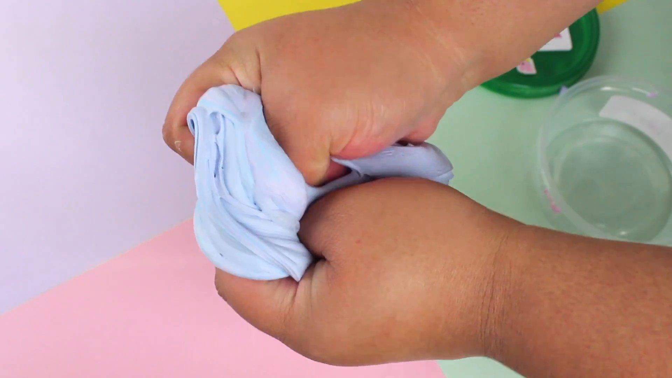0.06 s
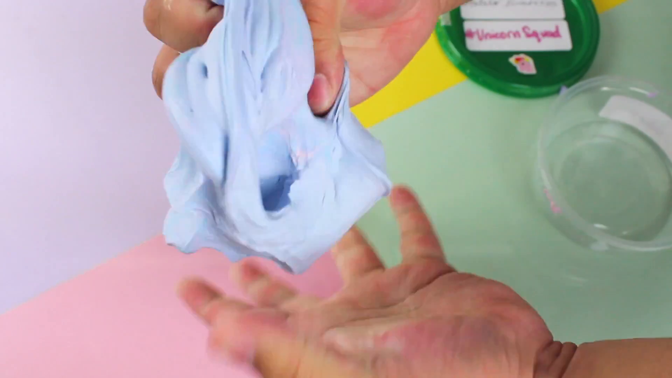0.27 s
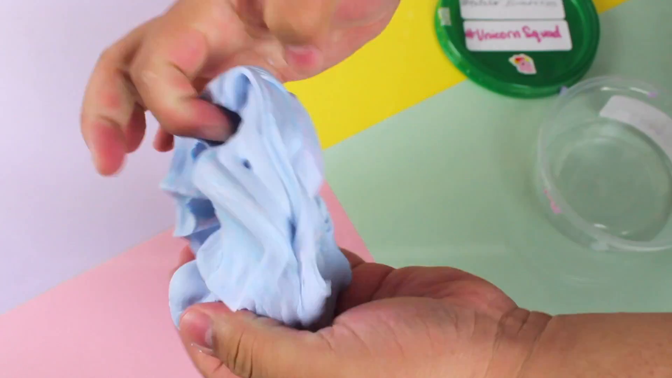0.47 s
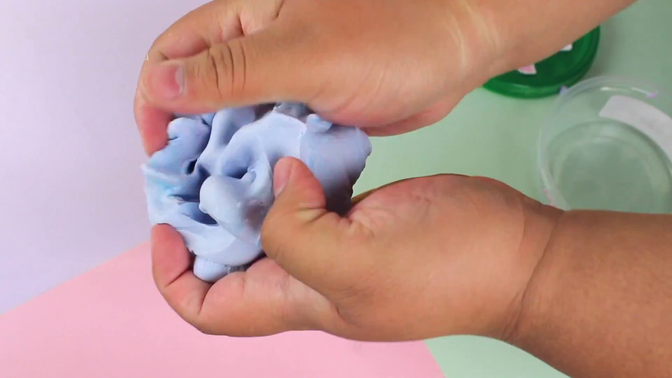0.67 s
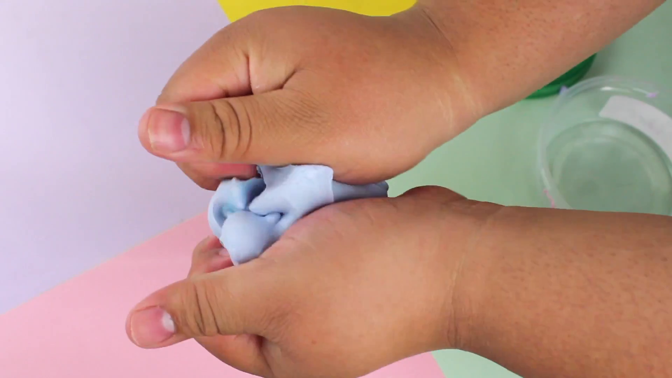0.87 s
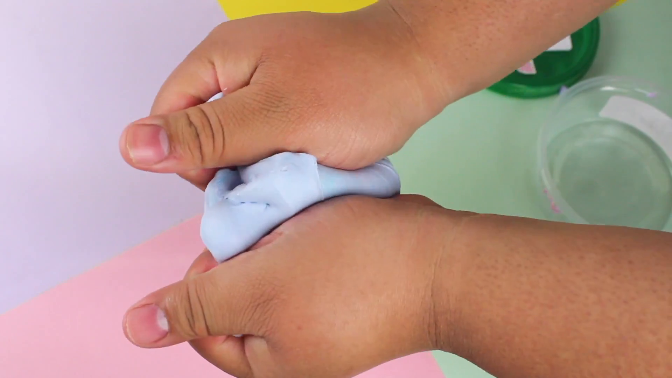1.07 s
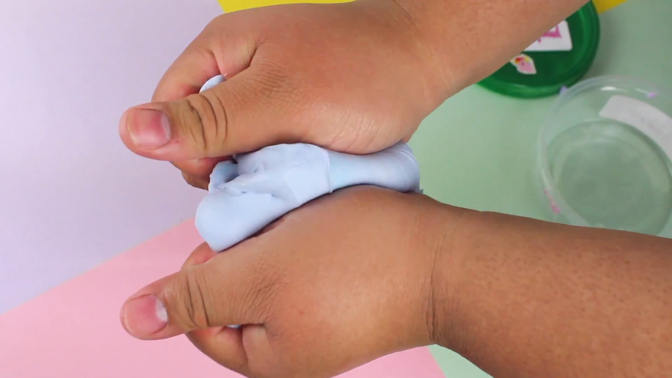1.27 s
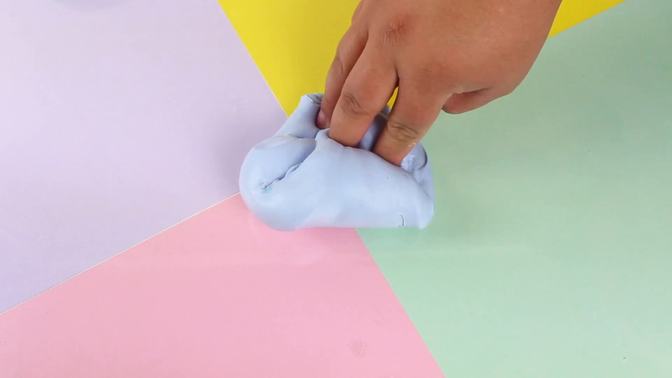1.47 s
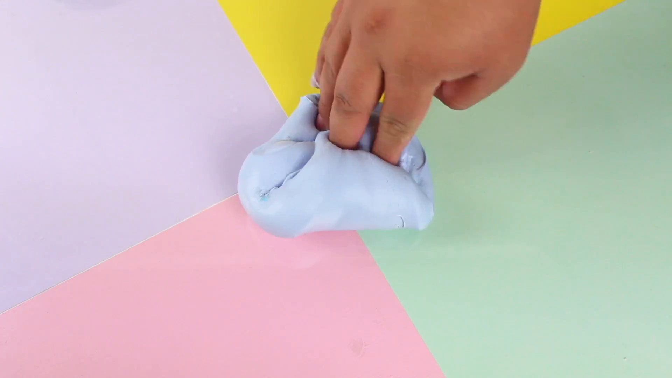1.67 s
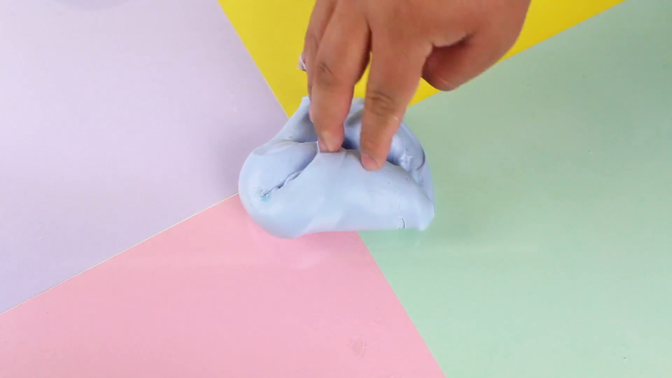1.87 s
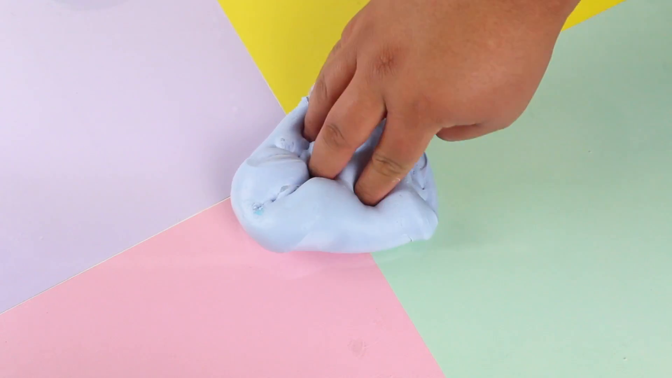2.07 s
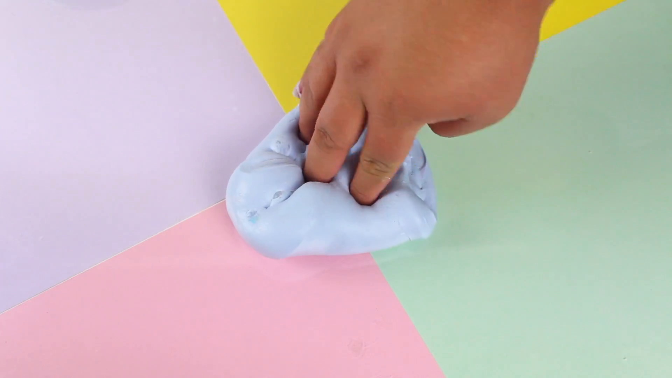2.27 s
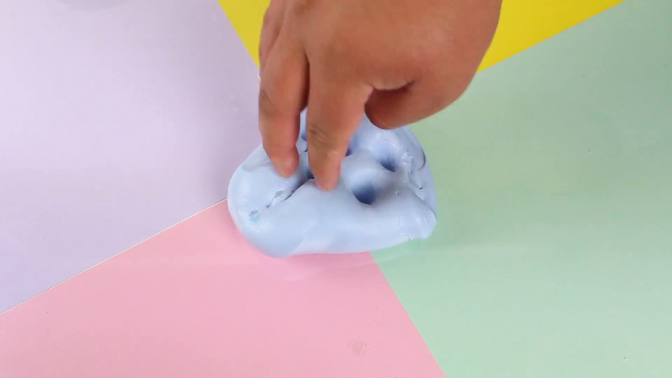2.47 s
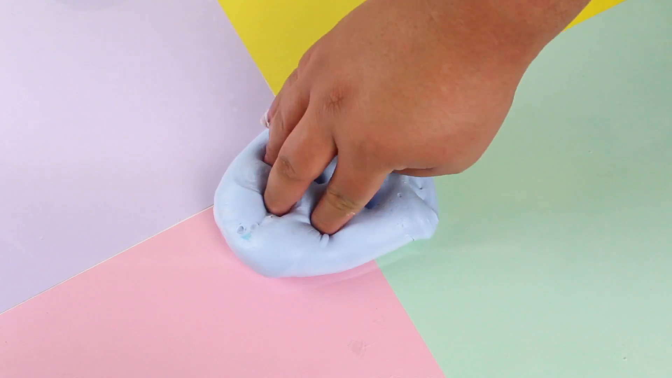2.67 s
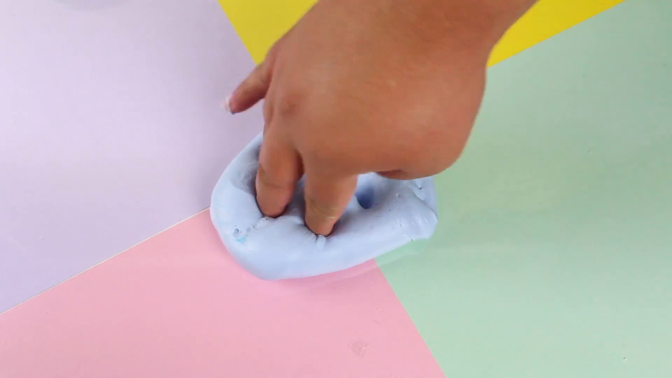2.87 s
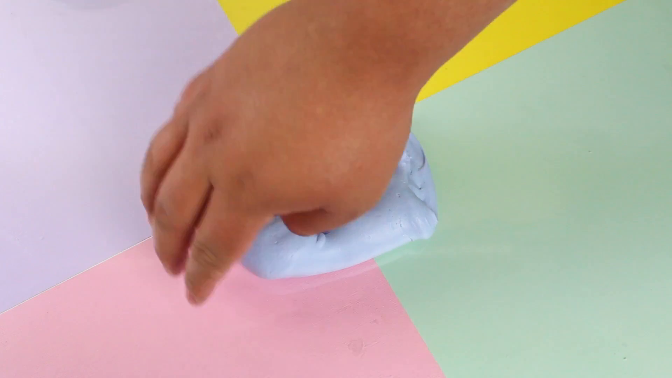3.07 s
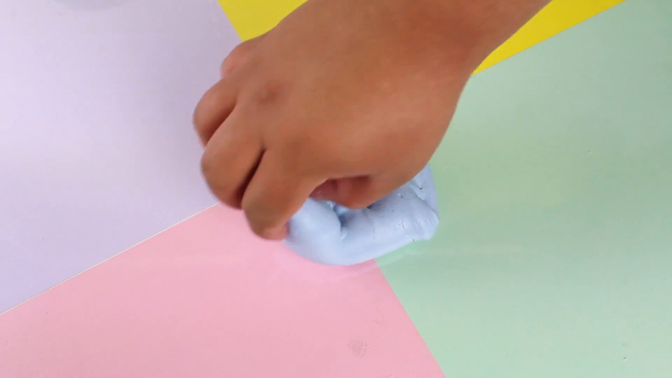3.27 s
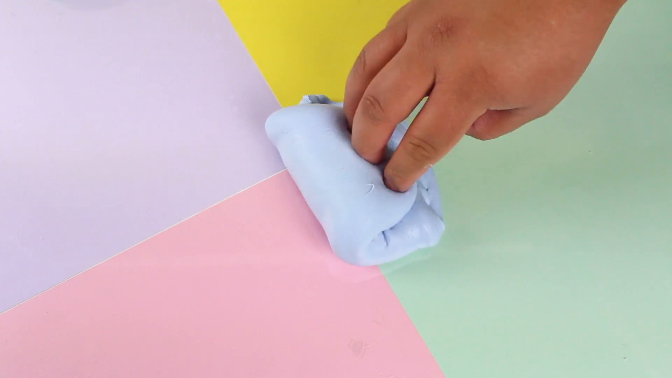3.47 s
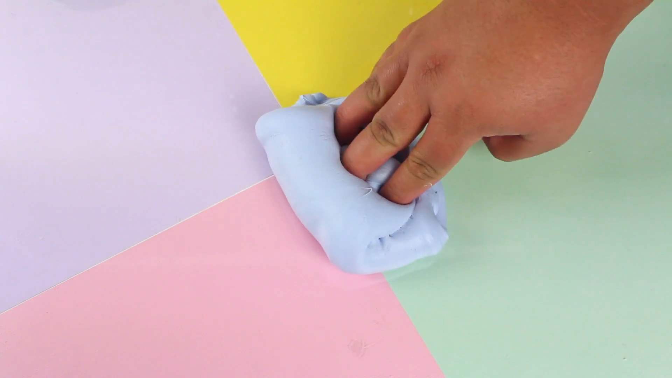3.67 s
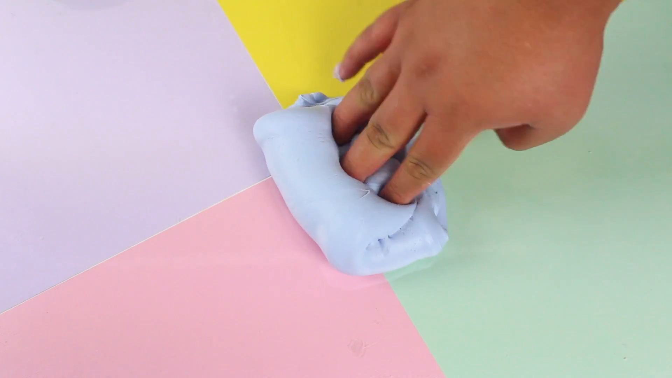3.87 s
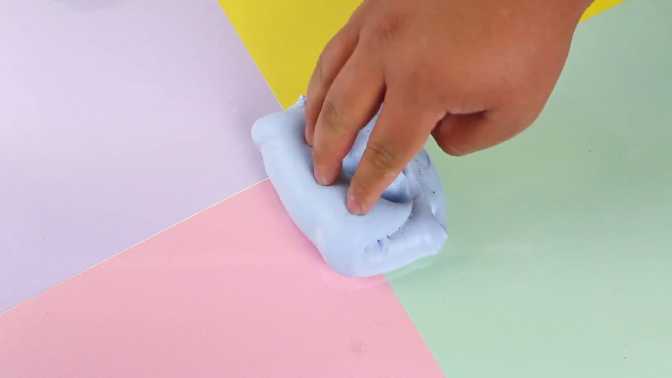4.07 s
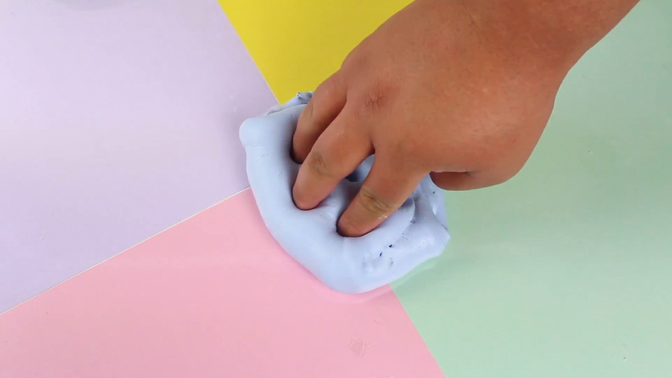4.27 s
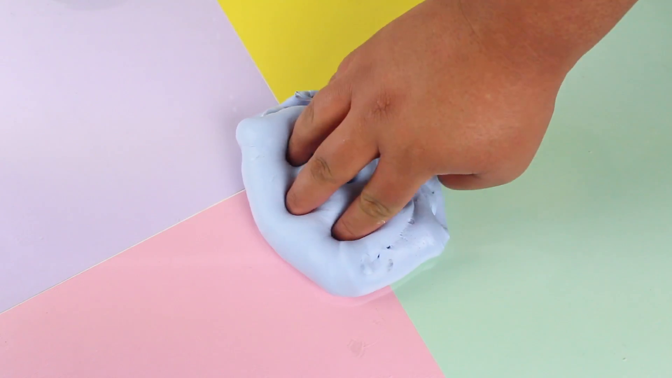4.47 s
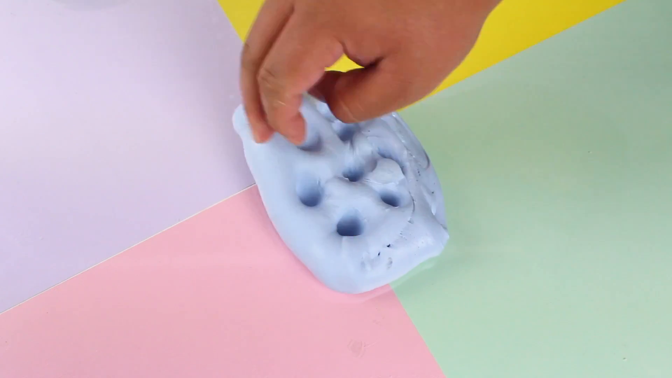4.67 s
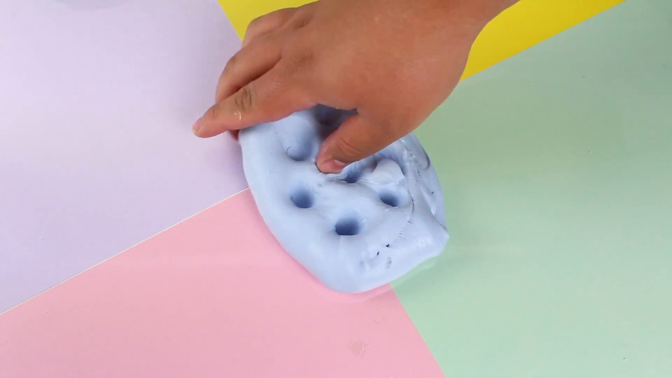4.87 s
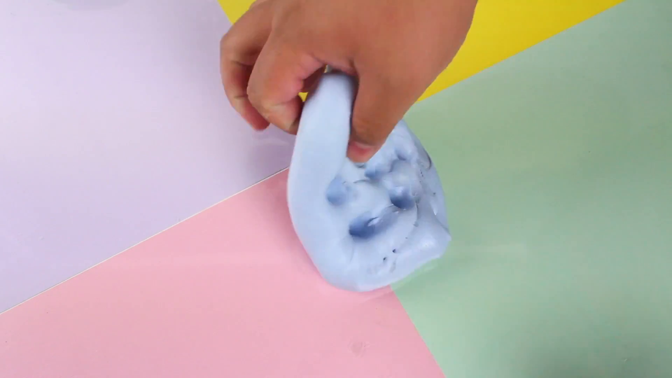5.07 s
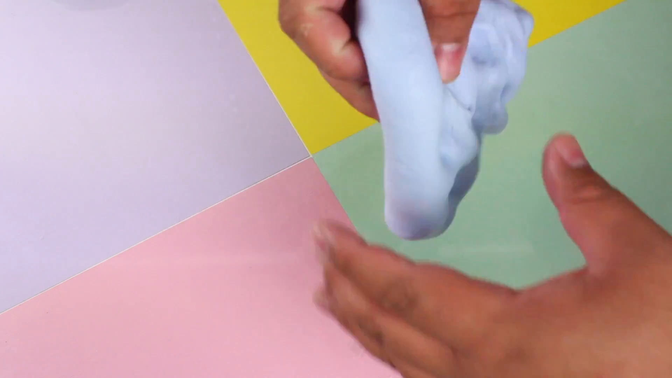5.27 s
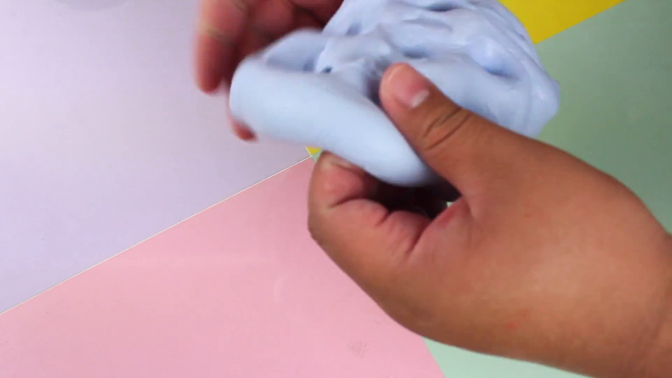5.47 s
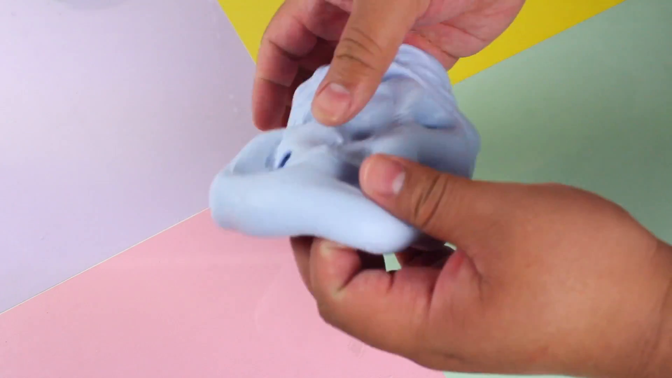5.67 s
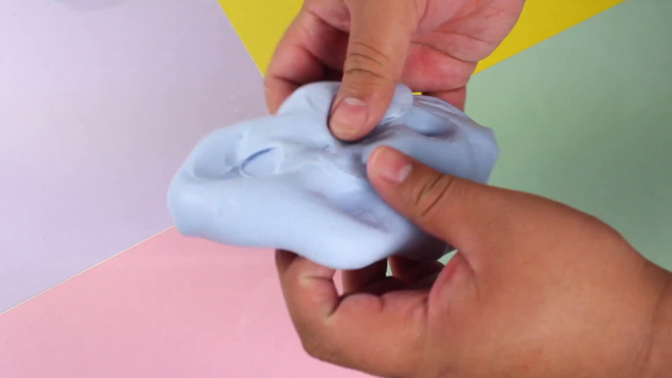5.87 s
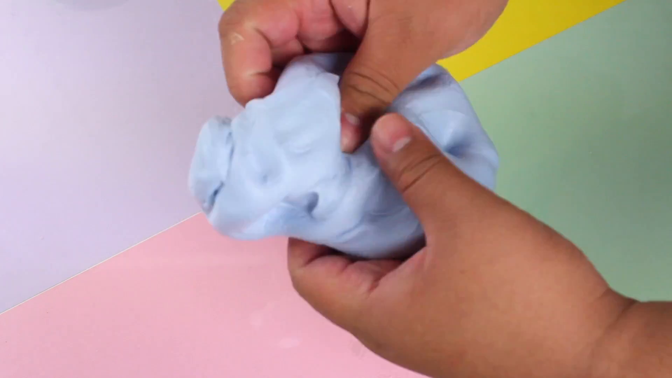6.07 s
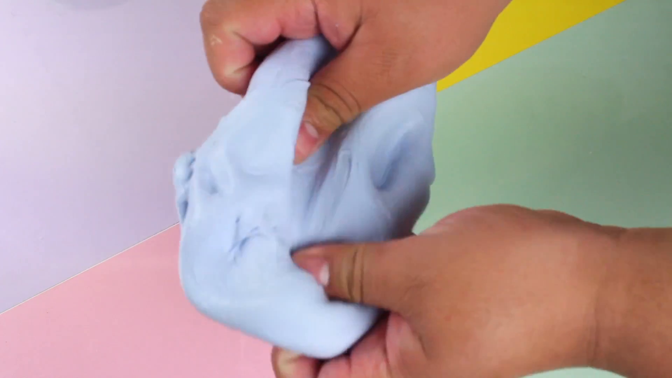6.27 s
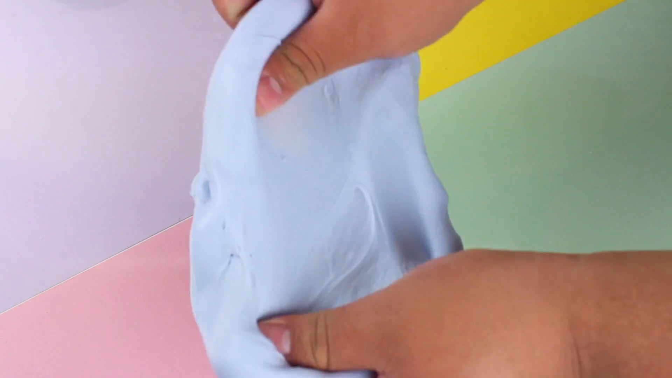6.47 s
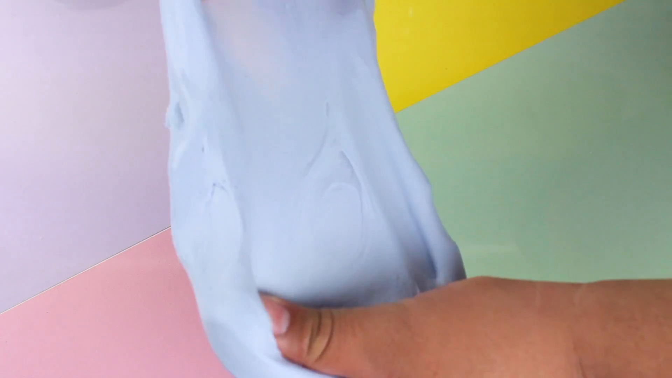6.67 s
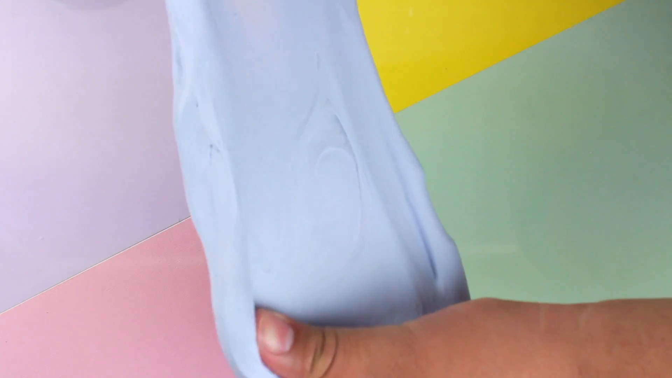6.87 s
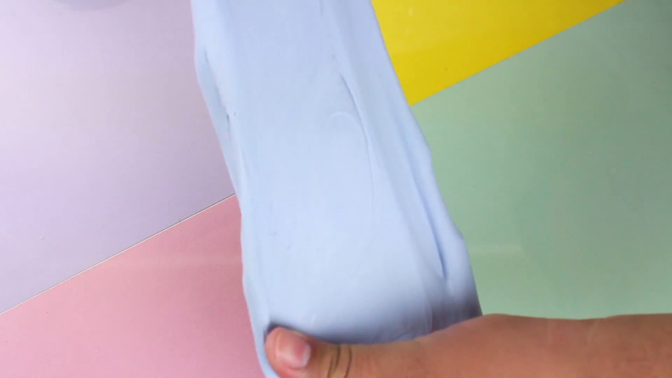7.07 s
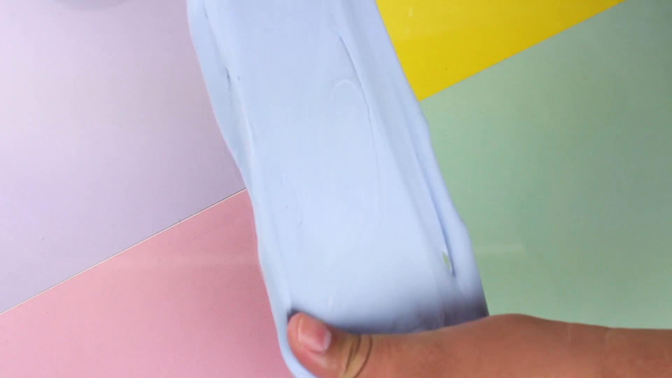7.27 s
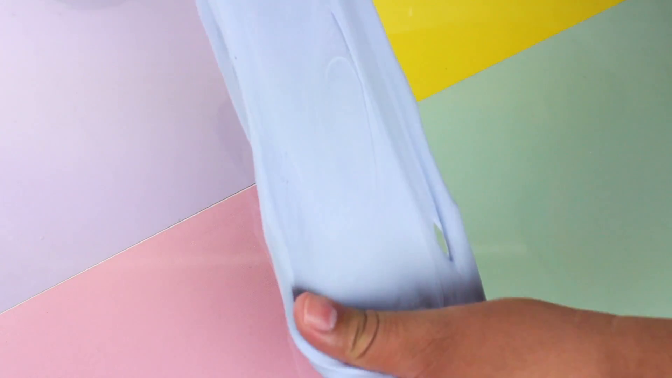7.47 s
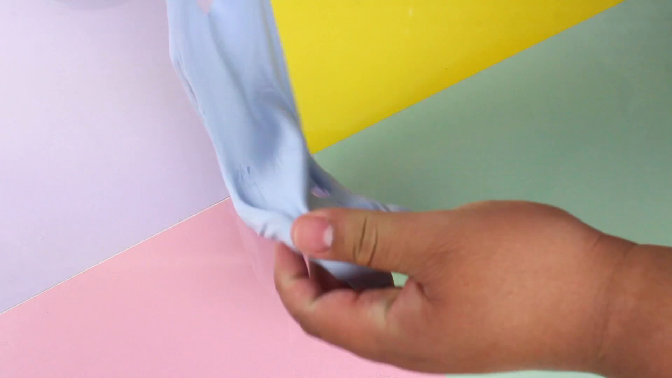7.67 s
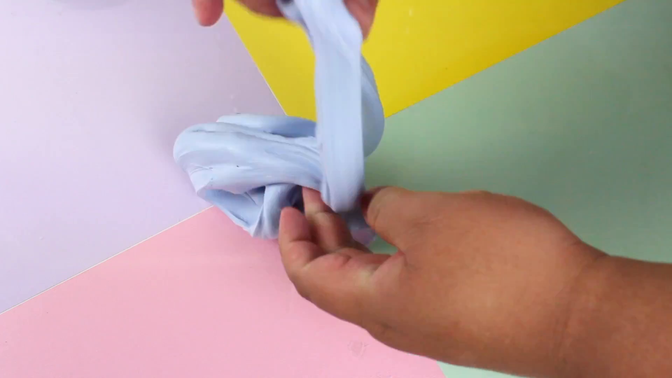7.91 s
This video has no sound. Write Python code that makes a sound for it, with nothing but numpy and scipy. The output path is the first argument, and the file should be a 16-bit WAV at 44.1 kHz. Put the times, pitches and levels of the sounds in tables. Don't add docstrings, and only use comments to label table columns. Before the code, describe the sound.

A small quiet room hums low and steady, with a short echo, heard very close. From 0 s hands fold and squeeze thick slime: fine wet crackle, sticky ticks, a snap at 0.2 s and tearing clumps just after. It eases to faint ticks, with a soft smack at 0.9 s, then pops at 1.0 and 1.1 s lead to a violent burst of overloaded cracks at 1.24-1.36 s. At 1.55 s the scene cuts, chopping the echo. Fingers poke the slime on a table at about 1.8, 2.4, 3.0, 3.2, 4.0 and 4.7 s, with sharp or dull hollow pops, short crackles and low tabletop booms; peeling ticks fill the gaps. Around 4.8-5.1 s it is lifted with soft thumps. Stretching follows, quiet, rustly and ticking, nearly still around 7 s, with a last sticky rustle and tick at 7.6-7.9 s.

```python
import sys
import numpy as np
from scipy import signal
from scipy.fft import rfft, irfft
from scipy.io import wavfile
from scipy.ndimage import uniform_filter1d

SR = 44100
rng = np.random.default_rng(int(sys.argv[2]) if len(sys.argv) > 2 else 0)


def undo_db(level):
    steps = np.asarray(level, float) / 20
    return 10 ** steps


def transcribe(u):
    v = np.clip(np.atleast_2d(u).T, -1, 1)
    q = np.round(v * 32767).astype(np.int16)
    wavfile.write(sys.argv[1], SR, q)


N = 350149
CHANGE_S = 1.547


def rms_one(x):
    return x / np.sqrt(np.mean(x ** 2) + 1e-20)


def at_hz(points, hz):
    table_hz, values = np.array(points).T
    return np.interp(np.log(hz), np.log(table_hz), values)


def band(x, low_hz, high_hz):
    limits = [low_hz, min(high_hz, .45 * SR)]
    return signal.sosfilt(signal.butter(2, limits, "band", fs=SR, output="sos"), x)


def low_pass(x, hz, order=2):
    return signal.sosfilt(signal.butter(order, hz, fs=SR, output="sos"), x)


def coloured(x, spectrum):
    hz = np.maximum(np.fft.rfftfreq(len(x), 1 / SR), 1)
    return rms_one(irfft(rfft(x) * undo_db(at_hz(spectrum, hz)), len(x)))


def resonance(x, hz, width_hz):
    r = np.exp(-np.pi * width_hz / SR)
    top = (1 - r * r) / 2
    return signal.lfilter([top, 0, -top], [1, -2 * r * np.cos(2 * np.pi * hz / SR), r * r], x)


def drift(rate_hz):
    r = np.exp(-80 * np.pi * rate_hz / SR)
    chance = rng.standard_normal(N // 40 + 2002)
    slow = signal.lfilter([1], [1, -2 * r, r * r], chance)[2000:]
    return np.interp(np.arange(N) / 40, np.arange(len(slow)), rms_one(slow))


def add(out, s, piece):
    i = round(s * SR)
    out[i:i + len(piece)] += piece[:N - i]


def room_tone():
    # pitch in Hz, level in dB per Hz.
    hush_colour = [(20, -38), (55, -7.5), (124, -4.5), (230, -3.5), (380, -9), (547, -17), (900, -38),
                   (16300, -43)]
    # pitch in Hz, width in Hz, level in dB.
    hums = [(118, 11, -65), (218, 20, -62), (309, 27, -63.5), (338, 23, -69), (533, 31, -69.5)]
    out = undo_db(-54.5) * coloured(rng.standard_normal(N), hush_colour)
    white = rng.standard_normal(N)
    for hz, width_hz, db in hums:
        out += undo_db(db + 4.5 * drift(1.9)) * rms_one(resonance(white, hz, width_hz))
    return out


def room(x):
    # pitch in Hz, time to fall 60 dB in seconds.
    echo_times = [(100, .5), (300, 0.45), (600, .33), (1000, 0.33), (3000, 0.3), (7000, .4), (14000, .3)]
    # pitch in Hz, echo energy in dB relative to the direct sound.
    echo_levels = [(100, -14.5), (400, -10), (1500, -9.5), (5000, -10), (10000, -6), (15000, -29)]
    t = np.arange(SR * 2 // 3) / SR
    edges = 60 * 2 ** np.arange(0, 8.6, .5)
    white, echo = rng.standard_normal((2, len(t))), 0
    for k, (low, high) in enumerate(zip(edges, edges[1:])):
        hz = np.sqrt(low * high)
        t60 = at_hz(echo_times, hz)
        unit_energy = np.sqrt(6 * np.log(10) / (t60 * SR))
        decay = undo_db(at_hz(echo_levels, hz) - 60 * t / t60)
        echo = echo + band(white[k % 2], low, high) * decay * unit_energy
    echo = echo * np.clip((t - .003) / .0025, 0, 1)
    before = np.arange(N) < CHANGE_S * SR
    return sum(signal.fftconvolve(x * part, echo)[:N] * part for part in (before, ~before))


def sideways(x):
    duller = undo_db(1) * low_pass(x, 3000, order=4) + undo_db(-11) * x
    return np.where(np.arange(N) < CHANGE_S * SR, x, duller)


def table_top():
    # start in
    # seconds, peak in dB, extra dB for deep pitches, extra dB for high ones.
    jolts = [(0.216, -42, -4, 7.5), (1.317, -30, -3, -2), (1.795, -21.5, -3, 2.5), (2.403, -18.5, -0.5, 0),
             (2.436, -17, -1, 3), (2.97, -21.5, -9, -5), (3.018, -19, -4, -4), (3.231, -13.5, -1, -10),
             (3.256, -21, 2, -4), (3.994, -22.5, 2, -9), (4.022, -21.5, -12, 9), (4.674, -16.5, 0, 0),
             (4.825, -21, -13, -1), (4.954, -21.5, 0, 5), (5.012, -29, -1, 0)]
    # pitch in Hz, level in dB, time to fall 60 dB in seconds.
    modes = [(74, -6.5, 0.5), (80.5, -5.5, 0.6), (140, 3.5, 0.15), (200.7, 3, 0.2), (294.4, 1.5, 0.25),
             (367, -6.5, 0.19), (480, -7, 0.14)]
    out, t = np.zeros(N), np.arange(SR // 2) / SR
    chance_db = rng.normal(0, 1.3, (len(jolts), len(modes)))
    for (s, db, deep_db, upper_db), own in zip(jolts, chance_db):
        for k, ((hz, mode_db, t60), own_db) in enumerate(zip(modes, own)):
            swell = (-1) ** k * (1 - np.exp(-t / .006))
            level_db = db + mode_db + own_db - 13.5 + deep_db * (hz < 100) + upper_db * (hz > 250)
            add(out, s, undo_db(level_db - 60 * t / t60) * swell * np.sin(2 * np.pi * hz * t))
    return out * undo_db(2.5 * drift(30))


def effort():
    # peak time in seconds, level in dB, seconds to rise 20 dB,
    # seconds to fall 20 dB, breadth in dB.
    squeezes = [
        (.02, -44, .05, .11, -2),
        (.22, -37, .05, .05, 0),
        (.276, -35, .08, .12, 0),
        (.46, -45, .3, .03, -4),
        (.57, -48, .15, .1, 3),
        (.744, -53, .3, .1, 0),
        (.98, -62, .2, .3, 2),
        (1.19, -53, .4, .05, -6),
        (1.328, -28, .025, .13, -6),
        (1.535, -39.5, .45, .6, -2),
    ]
    # peak time in seconds, level in dB, seconds to rise 20 dB,
    # seconds to fall 20 dB, breadth in dB.
    stretches = [(5.011, -49.5, 0.041, 0.1, -3), (5.15, -48.5, 0.167, 0.22, 3), (5.48, -51, .06, 0.035, 8),
                 (5.56, -46.5, 0.044, 0.018, -18), (5.73, -54, 0.27, 0.2, 1.5), (5.4, -61.5, .5, 1.64, 3.5),
                 (5.96, -50.5, 0.06, 0.031, 7), (6.14, -54, 0.041, 0.15, -16),
                 (6.24, -57, 0.019, 0.21, 4.5), (6.45, -58.5, 0.27, .2, -2), (6.52, -57, 0.041, 0.32, -1),
                 (7.02, -70.5, .07, .1, -3), (7.33, -67.5, 0.36, 0.046, -2), (7.645, -52, 0.095, 0.083, 0),
                 (7.8, -54, 0.25, 0.69, 0), (7.585, -56, .035, .5, 3)]
    # peak time in seconds, level in dB,
    # seconds to fall 20 dB, breadth in dB.
    finger_pokes = [
        (1.798, -40, 0.08, 2.5),
        (1.82, -51, 0.12, 4),
        (2.39, -52, 0.27, 0.5),
        (2.75, -67, .2, 5),
        (2.97, -43.5, 0.17, -4),
        (3.245, -50, 0.31, -1),
        (3.33, -58, 0.2, -2),
        (3.975, -43, 0.03, -8),
        (4.029, -46, 0.1, 3.5),
        (4.68, -38, 0.1, 5),
    ]
    rise_to_poke_s, rest_db = .026, -84
    t = np.arange(0, N + 40, 40) / SR
    power = np.full((3, len(t)), undo_db(2 * rest_db))
    pokes = [(s, db, rise_to_poke_s, fall_s, breadth_db) for s, db, fall_s, breadth_db in finger_pokes]
    for s, db, rise_s, fall_s, breadth_db in squeezes + pokes + stretches:
        swell_db = db - 20 * np.maximum((s - t) / rise_s, (t - s) / fall_s)
        layers_db = np.array([[-1 + breadth_db], [0], [-4.5 + .7 * breadth_db]])
        same_scene = (t < CHANGE_S) == (s < CHANGE_S)
        power += undo_db(2 * (swell_db + layers_db)) * same_scene
    return [np.interp(np.arange(N) / SR, t, 10 * np.log10(p)) for p in power]


def kneading():
    # pitch in Hz, level in dB.
    crackle_colour = [(800, -9.5), (1300, -7), (2000, -7.5), (2900, -10.5), (4400, -5.5), (6000, -9),
                      (10000, -9.5), (14000, -8.5)]
    folds, strands, sheen = effort()
    sizes = undo_db(4 * np.minimum(rng.exponential(1, N), 3.3)) * rng.choice([-1, 1], N)
    snaps_per_s = 2300 * undo_db(5 * drift(45))
    grains = sizes * (rng.random(N) < snaps_per_s / SR)
    dealt = rng.integers(0, 14, N)
    rub, out = rng.standard_normal((2, N)), 0
    for k, hz in enumerate(np.geomspace(800, 14500, 14)):
        layer = np.interp(np.log2(hz), np.log2([1000, 2000, 5000, 9000]), [0, 1, 1, 2])
        level_db = folds + min(layer, 1) * (strands - folds) + max(layer - 1, 0) * (sheen - strands)
        snaps = rms_one(grains * (np.abs(dealt - k) < 2)) + .85 * rub[k % 2]
        ring = rms_one(resonance(resonance(snaps, hz, hz / 3), hz, hz / 3))
        patch_db = 2.5 * drift(8) + 2 * drift(35)
        out = out + undo_db(level_db + at_hz(crackle_colour, hz) + patch_db) * ring
    return out


def clumps():
    # peak time in seconds, level in dB, pitch in Hz, seconds to rise 20 dB,
    # seconds to fall 20 dB.
    torn_clumps = [(.272, -33, 1300, .015, .02), (.27, -38, 3600, .02, .02), (.285, -40, 6500, .015, .015),
                   (.31, -37, 1150, .012, .015), (.333, -41, 1500, .012, .015), (.405, -45, 2100, .03, .03),
                   (.45, -47, 1200, .05, .04), (.515, -43, 2400, .015, .02), (.565, -43, 1250, .015, .015),
                   (.563, -47, 4400, .015, .02), (.585, -45, 1300, .008, .012),
                   (1.335, -22, 4200, .02, .08), (1.33, -23, 2500, .01, .07), (4.03, -28, 2300, .008, .09),
                   (4.065, -36, 2400, .02, .04), (4.703, -36, 2600, .015, .02), (4.7, -31, 750, .02, .03),
                   (4.69, -35, 1500, .01, .12), (1.822, -38, 4600, .012, .015),
                   (1.81, -35, 1000, .015, .05), (2.47, -36, 2000, .03, .08), (2.425, -30, 550, .02, .1),
                   (3.019, -27, 3000, .006, .05), (3.02, -31, 4800, .006, .04),
                   (2.974, -40, 7000, .004, .015), (3.236, -42, 6500, .004, .06),
                   (5.73, -52, 1700, .04, .05), (5.955, -51, 1700, .05, .03), (6.14, -50, 2700, .03, .04),
                   (6.14, -53, 1400, .015, .02), (6.18, -49, 3800, .05, .025), (4.817, -46, 850, .008, .01),
                   (5.145, -45, 800, .015, .04), (5.147, -45, 4200, .02, .04),
                   (5.145, -48, 1600, .015, .03), (5.338, -52, 1100, .01, .015),
                   (5.43, -50, 700, .01, .015), (5.48, -48, 950, .04, .04), (7.555, -61, 4400, .02, .04),
                   (7.655, -44, 3100, .04, .03), (7.69, -50, 2200, .02, .03), (7.765, -50, 3000, .04, .04),
                   (7.78, -55, 1600, .06, .04), (7.925, -52, 900, .03, .05)]
    half_width = 2 ** .35
    out, t = np.zeros(N), np.arange(-3000, 7000) / SR
    noise = rng.standard_normal((len(torn_clumps), 2, len(t)))
    for (s, db, hz, rise_s, fall_s), (z, lumps) in zip(torn_clumps, noise):
        grain = undo_db(2.5 * rms_one(uniform_filter1d(lumps, size=90)))
        rush = rms_one(band(z * grain, hz / half_width, hz * half_width))
        add(out, s + t[0], undo_db(db - 20 * np.maximum(-t / rise_s, t / fall_s)) * rush)
    i = np.arange(N)
    return out * ((i < CHANGE_S * SR) | (i > (CHANGE_S + .1) * SR))


def strays():
    per_s, over_crackle_db, spread_db, edge_db = 14, 2, 3, -22
    when, size, pitch, edge = rng.random((int(per_s * N / SR), 4)).T
    s = when * (N / SR - .02)
    work_db = np.minimum(effort()[1][(s * SR).astype(int)], -52)
    db = work_db + over_crackle_db + spread_db * (2 * size - 1)
    return list(zip(s, db, 900 * 6 ** pitch, edge_db + 24 * (edge - .5)))


def ticks():
    # start in seconds, peak in dB, pitch in Hz, sharp edge in dB over the ring.
    squeeze_ticks = [(0.0116, -31, 4300, -3), (0.032, -23.5, 5000, 2), (0.059, -27, 4320, -2),
                     (0.091, -28, 4640, -25), (0.388, -33.5, 2730, -20), (0.5139, -38, 2860, -20),
                     (0.6617, -32, 3780, -27.5), (0.7985, -45, 2350, -5), (0.8271, -42.5, 2070, -6),
                     (0.9285, -26, 2200, -13), (0.9344, -24, 3254, -7), (0.9647, -43, 1420, -23.5),
                     (1.0013, -39, 2500, -15), (1.0055, -40, 7000, 0), (.9125, -44, 5000, -5),
                     (1.1805, -36, 6000, 0), (1.2325, -38, 11000, 0), (1.0957, -33.5, 7700, -13.5),
                     (1.1382, -27, 4845, -6.5), (1.1803, -30, 1020, -7.5), (1.1913, -37.5, 3324, -22),
                     (1.1993, -27, 3360, -13), (1.2412, -7.5, 3370, -8), (1.2472, -18.5, 5647, -22.5),
                     (1.3600, -18, 8000, -3.5), (.586, -38, 4000, -30), (1.534, -30, 2240, -15)]
    peel_ticks = [(2.1055, -42.5, 2004, -22.5), (2.1707, -41, 3130, -16), (2.6562, -40, 1190, -7.5),
                  (2.676, -34, 916, -28), (2.7251, -43, 9000, 0), (2.719, -46, 3040, -20),
                  (2.893, -56, 4200, -20), (2.7416, -44, 3600, -28), (2.7541, -40.5, 2205, -26),
                  (2.78, -39.5, 2540, -13.5), (2.9799, -23.5, 1095, -11.5), (3.2581, -27, 2500, -12),
                  (3.2949, -45, 1038, -21.5), (3.4796, -39, 885, -12.5), (3.5081, -40.5, 2633, -6),
                  (3.631, -38, 4600, -19), (3.645, -54, 9000, -5), (3.862, -56, 10000, -5),
                  (3.6652, -38, 1080, -23), (3.7572, -32.5, 2670, -21.5), (3.8291, -48.5, 3230, -20.5),
                  (3.9935, -34, 5000, 0), (3.9314, -49, 5490, -26), (4.186, -50.5, 8000, -2),
                  (4.2453, -41.5, 4290, -17), (4.2802, -41, 2070, -8.5), (4.2899, -43.5, 2370, -6),
                  (4.3377, -48, 1530, -24), (4.8116, -30.5, 1240, -20), (4.8378, -41, 2130, -11),
                  (4.969, -27, 1710, -34)]
    stretch_ticks = [(5.1447, -36, 3810, -5), (5.272, -45, 1600, -15), (5.31, -46, 4500, -35),
                     (5.373, -45, 1700, -8), (5.556, -35, 2500, 0), (5.586, -45, 3000, -25),
                     (5.2446, -40, 2260, -38), (5.3207, -42, 900, -10), (5.4669, -34, 2280, -28),
                     (5.4807, -31.5, 930, -37), (5.6278, -42.5, 3800, -36.5), (5.6613, -33, 1810, -4),
                     (5.6894, -40.5, 2600, -0.5), (5.719, -37, 2710, -30.5), (5.7598, -36.5, 3850, -25.5),
                     (5.8235, -41, 5790, -18), (5.8681, -40.5, 1070, -20), (5.8936, -35, 1790, -8),
                     (6.0192, -37.5, 8980, -16), (6.0998, -44, 4610, -15.5), (6.1876, -32.5, 4110, -14.5),
                     (6.1956, -30, 4340, -31), (6.2819, -41, 1924, -24), (6.4325, -39.5, 1930, -15),
                     (6.4519, -39.5, 900, 2), (6.532, -36, 5080, -6.5), (6.5482, -39, 990, -19),
                     (6.6262, -43, 4245, -18), (6.6557, -49, 4240, -22.5), (7.0139, -40, 3770, -17),
                     (6.9756, -50, 3320, -22), (7.2216, -47, 2370, -23), (7.291, -40, 1890, -45),
                     (7.3351, -44, 2144, -44), (7.8201, -30.5, 3170, -17),
                     (6.991, -53, 1900, -30),
        (7.04, -53, 3500, -30),
        (7.0575, -49.5, 1600, -14),
        (7.166, -49, 2500, -19),
        (7.2086, -49, 4000, -12),
        (7.262, -50, 4500, -28),
        (7.275, -51, 4000, -14),
        (7.3163, -50, 2600, -12),
        (7.41, -54, 3000, -16),
    ]
    rows = squeeze_ticks + peel_ticks + stretch_ticks + strays()
    out, t = np.zeros(N), np.arange(600) / SR
    for (s, db, hz, edge_db), z in zip(rows, rng.standard_normal((len(rows), 600))):
        slip = z * undo_db(-60 * t / .008)
        spread = np.clip(1.75 + edge_db / 70, 1.12, 1.8)
        ring = band(slip, hz / spread, hz * spread)
        edge = undo_db(.75 * edge_db + 1.5) * band(slip, hz, 15500)
        tick = ring / np.abs(ring).max() + edge
        add(out, s, undo_db(db) * tick / np.abs(tick).max())
    return out


def hollow(hz, cycles, opening_s):
    t = np.arange(2400) / SR
    opening = (1 - np.exp(-t / opening_s)) ** 3
    main = np.sin(2 * np.pi * hz * t * (1 - 2.5 * t))
    upper = .45 * np.sin(2 * np.pi * 1.45 * hz * t)
    ring = opening * undo_db(-60 * t * hz / cycles) * (main + upper)
    return ring / np.abs(ring).max()


def burst(out, row, noise, spatter_db, dull_hz):
    s, db, hz, hollow_hz, hollow_db = row
    since = np.arange(len(noise)) / SR - .0007
    climb = np.exp(since.clip(max=0) / .00014)
    drop = -np.exp(-since.clip(min=0) / .00005)
    tear = np.where(since < 0, climb, drop)
    snap = tear + 1.5 * resonance(tear, hz, hz / 2.5)
    spray = rms_one(band(noise, hz / 4, hz * 1.87) + .013 * noise)
    spatter = spray * undo_db(-60 * since / .031) * (since > 0)
    snap[28:] += .064 * snap[:-28]
    crack = snap / np.abs(snap).max() + undo_db(spatter_db) * spatter
    add(out, s - .0006, undo_db(db) * low_pass(crack, dull_hz))
    add(out, s, undo_db(db + hollow_db) * hollow(hollow_hz, cycles=10, opening_s=.0008))


def pops():
    # start in seconds, snap peak in dB, snap pitch in Hz, hollow pitch in Hz,
    # hollow level in dB over the snap. First the sharp bursts.
    sharp_pops = [(0.2200, -14.5, 3630, 425, -9), (1.0212, -18, 2360, 443, -15.5),
                  (1.1074, -13.5, 7040, 1130, -27.5), (1.2407, 0, 4000, 1250, -29.5),
                  (1.2885, -15, 4573, 565, -11.5), (1.3111, -8.5, 4200, 1229, -18),
                  (1.3146, 3.5, 4630, 1179, -16), (1.3185, 2, 4000, 990, -31.5),
                  (1.3205, 3.5, 4050, 990, -13), (1.3542, -5, 8600, 882, -18), (1.3550, 0, 2600, 882, -18),
                  (1.3557, -2, 8000, 882, -18), (1.7863, -14, 2000, 1900, 0), (2.4056, -6, 4380, 1020, 0),
                  (2.4376, -3, 2200, 2200, -12), (3.0162, -10, 2806, 1049, -6), (4.022, -1, 2500, 640, -8),
                  (4.6751, -1, 2600, 592, -6.5)]
    soft_smacks = [(0.0155, -22, 1670, 1130, -19), (0.0318, -23, 1540, 1160, -20),
                   (0.8719, -14, 2040, 424, -22.5), (1.28, -17, 1491, 460, 2),
                   (1.7950, -12, 3900, 2020, -1), (1.7965, -22, 4000, 1050, 6),
                   (2.4405, -26, 1500, 1000, 14), (2.974, -30, 1497, 533, 2),
                   (3.0116, -23, 1518, 1270, 5.5), (3.025, -16.5, 1650, 552, -4.5),
                   (3.2335, -16, 2900, 455, -11.5), (3.9969, -13, 2500, 987, 1), (4.828, -44, 800, 480, 15),
                   (4.9555, -18, 1660, 426, -21.5), (5.0145, -39.5, 1616, 686, 8.5)]
    out = np.zeros(N)
    for row, z in zip(sharp_pops, rng.standard_normal((len(sharp_pops), 2400))):
        burst(out, row, z, spatter_db=-16.5 - .3 * row[-1], dull_hz=17000)
    for row, z in zip(soft_smacks, rng.standard_normal((len(soft_smacks), 2400))):
        burst(out, row, z, spatter_db=-6.5 + .55 * row[-1], dull_hz=row[2] * 1.6)
    return out


def scene():
    slime = pops() + ticks()
    mix = room_tone() + table_top() + kneading() + clumps() + slime + room(sideways(slime))
    return mix[None]


def top_cut(x):
    return signal.sosfilt(signal.butter(12, 15720, fs=SR, output="sos"), x)


def record(dry):
    mic = signal.sosfilt(signal.butter(2, 45, "high", fs=SR, output="sos"), dry)
    mic = low_pass(mic, 17000, order=4)
    mic = mic - .04 * np.minimum(mic ** 4, 2)
    return top_cut(np.clip(mic, -1, 1))


dry = scene()
out = record(dry)
transcribe(out)
```